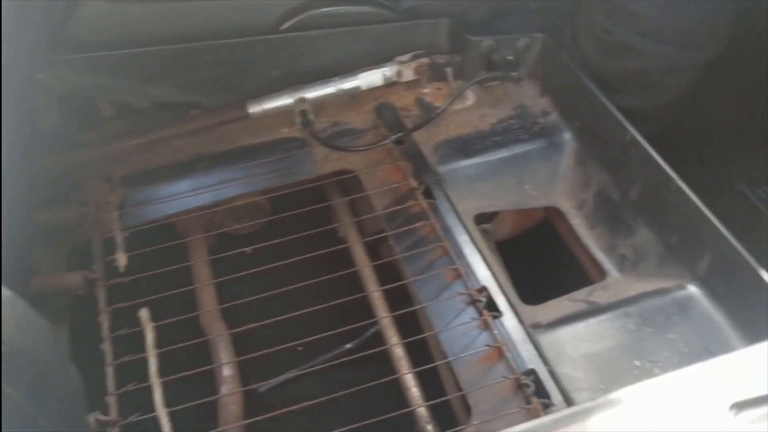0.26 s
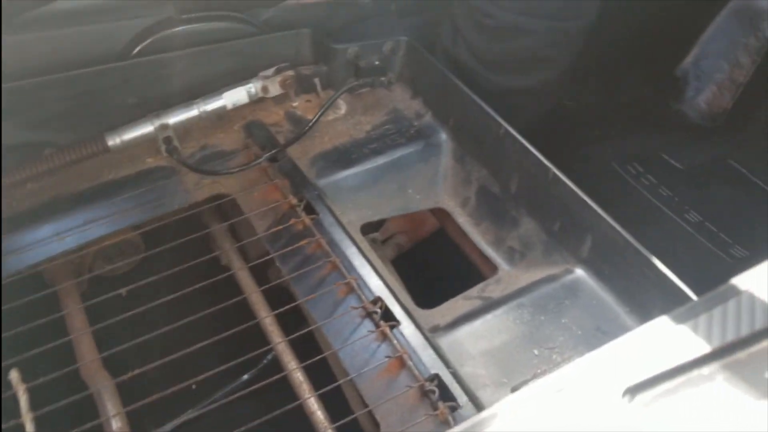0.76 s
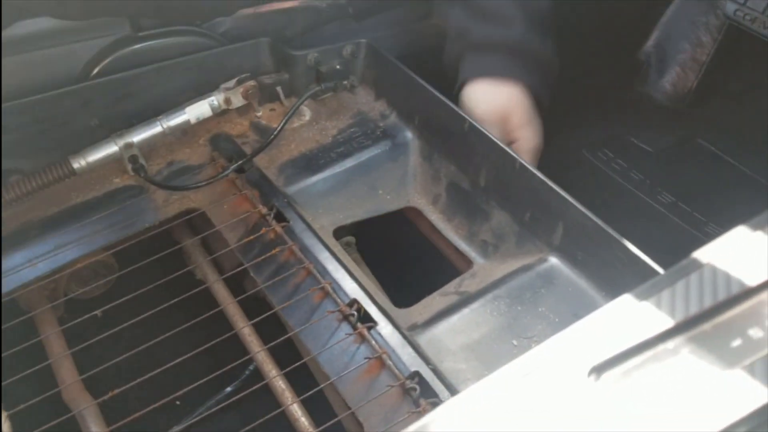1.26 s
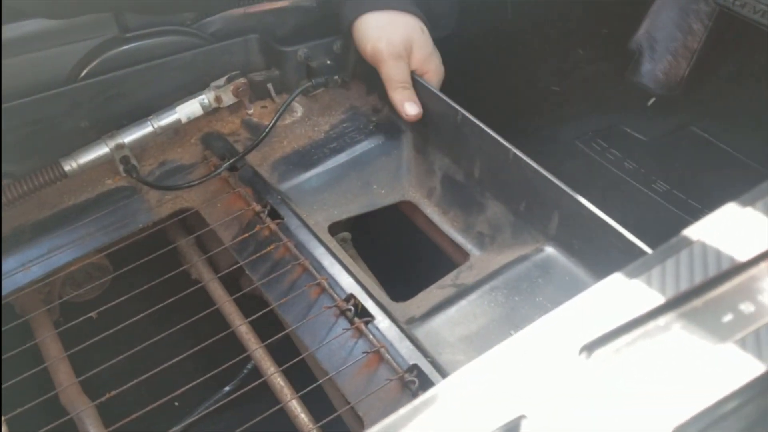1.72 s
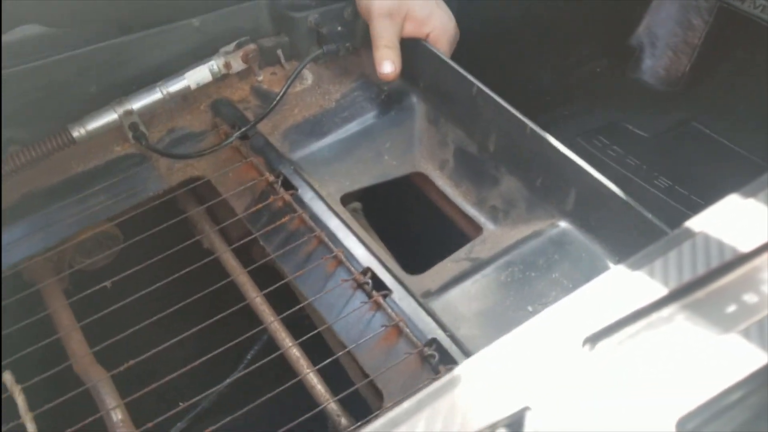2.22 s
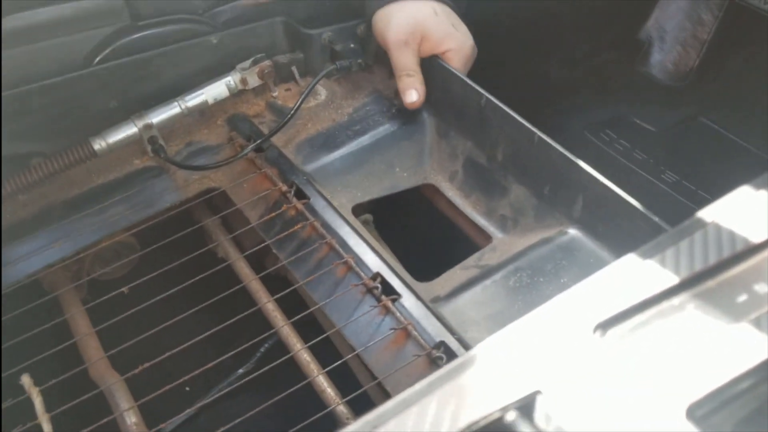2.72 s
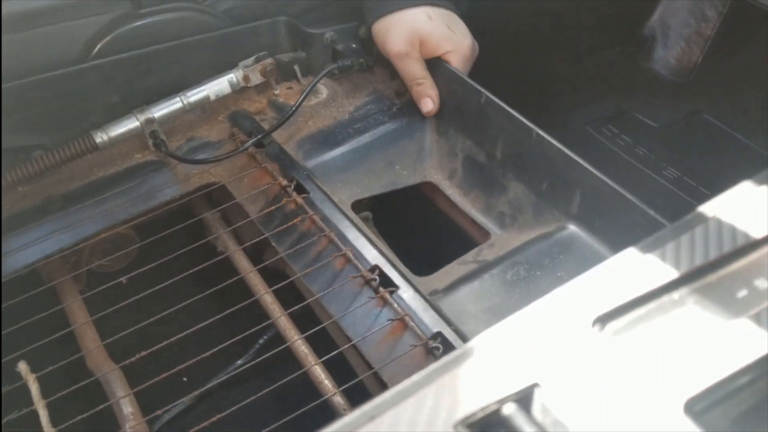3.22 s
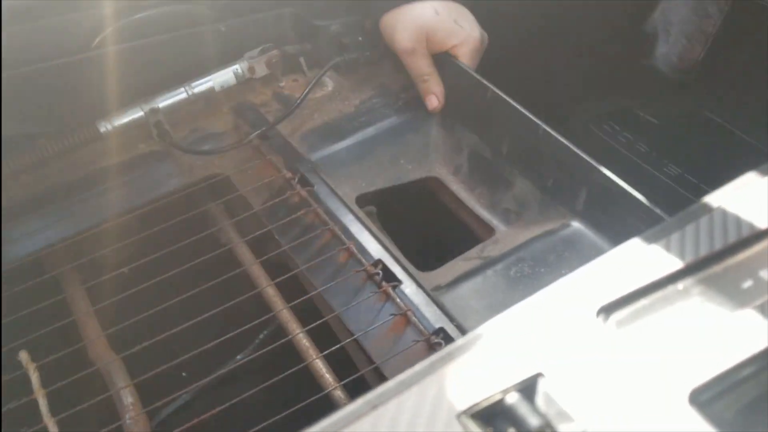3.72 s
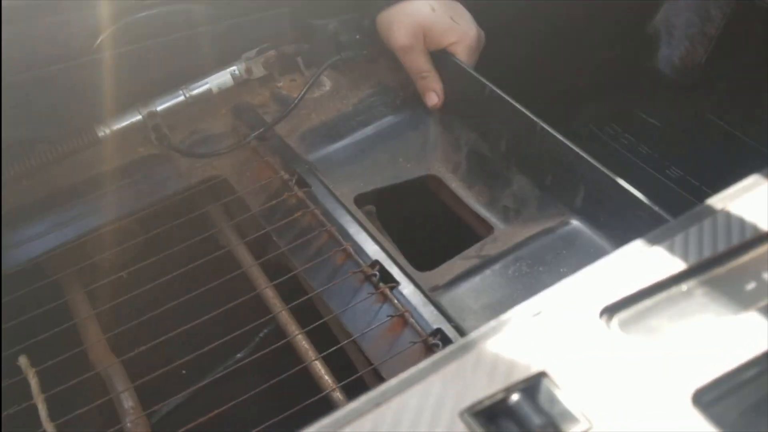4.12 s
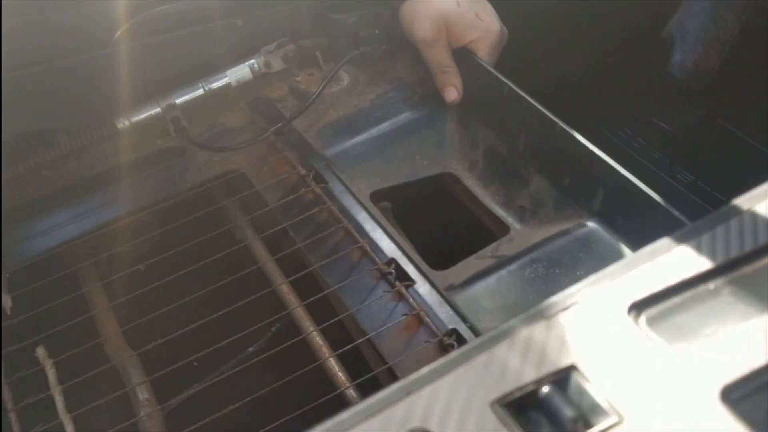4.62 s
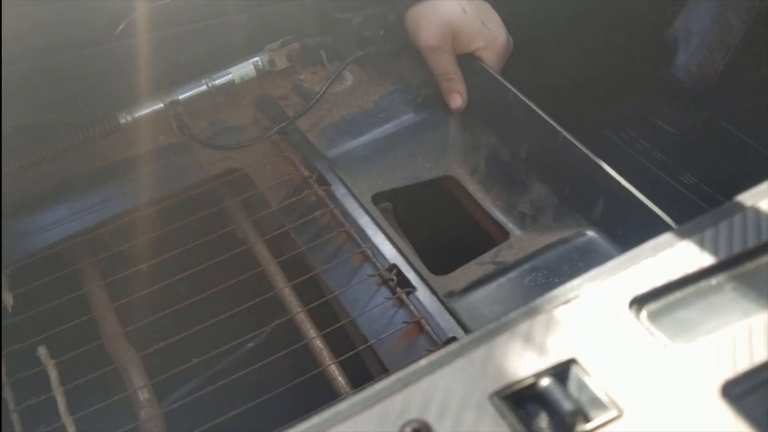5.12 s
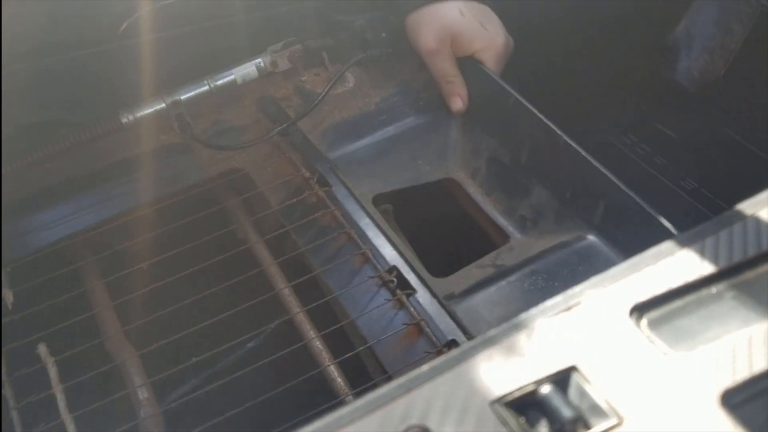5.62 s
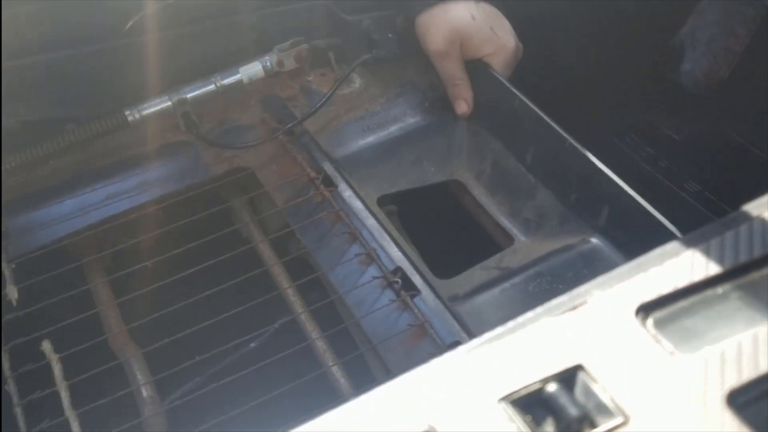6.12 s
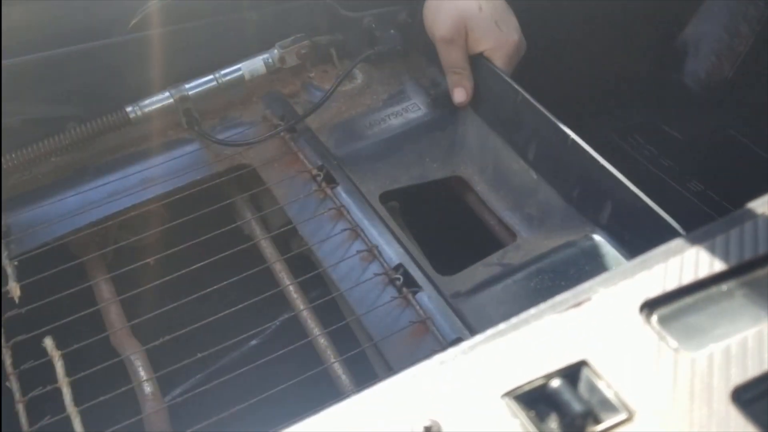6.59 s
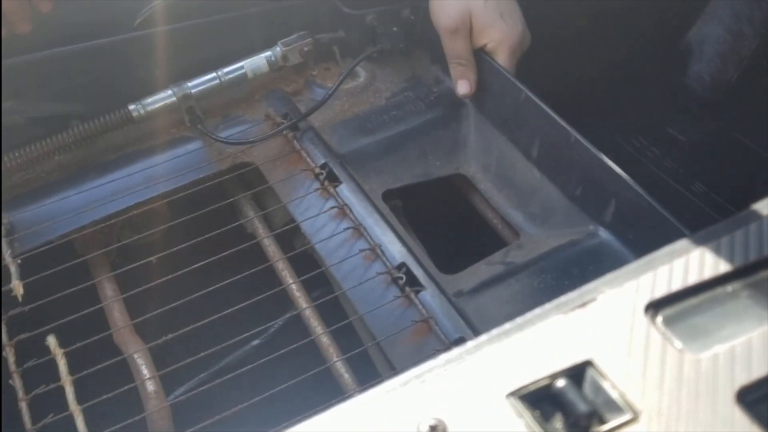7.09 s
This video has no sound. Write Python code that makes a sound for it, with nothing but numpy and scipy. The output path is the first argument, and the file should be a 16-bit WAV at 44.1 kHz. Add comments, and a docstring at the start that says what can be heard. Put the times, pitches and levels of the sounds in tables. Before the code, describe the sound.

Close inside a quiet parked car, a hand shifts a steel seat base. Faint rubs and nudges come first, then a heavy dull thump near two seconds. Rusty scraping and a short low squeal follow, with rattling clacks, and just before and at five seconds thuds and a hard bright clank as it drops home. Afterwards only small ticks and cloth rustle. The work leans left in a short, dull, padded space.

```python
"""Shifting a car seat base by hand

The pressed-steel base of a car seat is shifted onto its bolts, close by, inside a parked car.
It thumps on the floor, scrapes, squeals and clacks along its mounts and drops home; wire springs hum on.
Blows set steel and floor modes ringing, shaped noise makes the scrapes, rumble and rubbing of sleeve
and upholstery, and unsteady sines make the squeals."""
import sys
import numpy as np
from scipy import signal
from scipy.fft import rfft, irfft
from scipy.io import wavfile
from scipy.ndimage import uniform_filter1d

SR = 44100
rng = np.random.default_rng(int(sys.argv[2]) if len(sys.argv) > 2 else 0)


def generate_wav(signal):
    """Clip the signal to [-1, 1] and save it as 16-bit WAV at the path in sys.argv[1]."""
    frames = np.transpose(np.atleast_2d(signal))
    scaled = np.clip(frames, -1, 1) * 32767
    pcm = np.round(scaled).astype(np.int16)
    wavfile.write(sys.argv[1], SR, pcm)


N = 324135   # length in samples
TIME = np.arange(N) / SR


def from_db(db):
    """Turn decibels into a plain gain."""
    return 10 ** (np.asarray(db) / 20)


def rms_one(x):
    """Scale a signal to an average (rms) level of 1."""
    return x / np.sqrt(np.mean(x ** 2) + 1e-20)


def response(points, size=4096):
    """Causal (minimum-phase) impulse response of a spectrum, found through its cepstrum."""
    hz, db = np.transpose(points)
    bins_hz = np.arange(size // 2 + 1) * SR / size
    log_gain = np.log(from_db(np.interp(np.log(bins_hz + 1), np.log(hz), db)))
    cepstrum = irfft(log_gain)[:size // 2]
    cepstrum[1:] *= 2
    return irfft(np.exp(rfft(cepstrum, size)))


def colour(x, points):
    """Filter by a spectrum."""
    return signal.oaconvolve(np.atleast_2d(x), response(points)[None], axes=1)[:, :N]


def band(x, low_hz, high_hz):
    """Band-pass that roughly keeps the power of white noise."""
    sos = signal.butter(2, [low_hz, high_hz], "band", fs=SR, output="sos")
    return signal.sosfilt(sos, x + 1e-18) * np.sqrt(SR / 2 / (high_hz - low_hz))


def ring(clicks, hz, t60):
    """A unit click sets off a sine of height 1 that fades by 60 dB in t60 seconds."""
    r, w = from_db(-60 / (t60 * SR)), 2 * np.pi * hz / SR
    return signal.lfilter([0, np.sin(w)], [1, -2 * r * np.cos(w), r * r], clicks + 1e-18)


def flutter(size):
    """Smooth chance of spread 1 that changes within size samples."""
    smooth = uniform_filter1d(rng.standard_normal(N), size)
    return rms_one(uniform_filter1d(smooth, size))


def grains(per_s, spread_db):
    """Two streams of tiny slips of uneven size; rms 1."""
    sizes = from_db(spread_db * np.minimum(rng.exponential(1, (2, N)), 4))
    happens = rng.random((2, N)) < per_s / SR
    return rms_one(sizes * rng.standard_normal((2, N)) * happens)


SWELL_DB = 20   # rise per attack time and fall per release time


def stroke(start, attack_s, release_s, hold_s=0):
    """Gain of one push: it rises by SWELL_DB per attack time, holds, and falls as much per release time."""
    early = np.maximum(start - TIME, 0)
    late = np.maximum(TIME - start - hold_s, 0)
    return from_db(-SWELL_DB * np.minimum(early / attack_s + late / release_s, 10))


def pan(x, db):
    """Left and right, db apart."""
    return np.array([x * from_db(db / 2), x * from_db(-db / 2)])


# How much of the sound differs between the two sides.
# Each row: frequency in Hz, gain of the differing part in dB.
SIDE_SPREAD = [(60, -11), (250, -12), (550, -3), (1000, -3.5), (3000, -4.5), (15000, 1.5)]


def widen(pair):
    """Left and right from a shared and a scattered part: the bass is nearly alike on both sides."""
    return pair[0] + colour(pair[1], SIDE_SPREAD) * [[1], [-1]]


# Tone of the still air. Each row: frequency in Hz, relative level in dB per Hz.
STILL_AIR_SPECTRUM = [(15, -32.5), (40, -14), (75, 0), (105, -4), (140, -3), (220, -19), (400, -26),
                      (600, -37), (800, -40), (1050, -33), (1600, -42), (2800, -45), (5000, -41),
                      (8000, -51), (15500, -49)]
STILL_AIR_DB = -53   # before widening


def still_air():
    """The quiet of the car is steady noise, shaped by a spectrum and strongest in the bass."""
    noise = rms_one(colour(rng.standard_normal((2, N)), STILL_AIR_SPECTRUM))
    return widen(from_db(STILL_AIR_DB) * noise)


# The seat rocking under the hand, with straight lines in dB between rows.
# Each row: time in seconds, level in dB before the trim, left minus right in dB before the scene's own lean.
ROCKING_PATH = [(0.0, -52, -0.5), (0.75, -56.5, 2), (1.401, -49.5, 4), (1.75, -46.5, 5), (1.93, -43, -2.5),
                (2.38, -50, 3), (2.56, -42, 2.5), (3.13, -49, 1), (3.841, -39.5, -2), (4.15, -50.5, 5),
                (4.39, -46, 1.5), (4.74, -40, -2.5), (4.92, -28.5, -2), (5.351, -50, 1), (5.77, -54.5, 4),
                (7.301, -49, 0.5)]
# Tone of the rumble. Each row: frequency in Hz, relative level in dB per Hz.
RUMBLE_SPECTRUM = [(18, -21.5), (35, 3.5), (60, 8.5), (140, -2), (220, -11), (330, -9.5), (450, -18.5),
                   (600, -29.5), (800, -37), (1100, -29.5), (2000, -45.5), (5000, -71.5)]


def rocking(level_db=-1.0):
    """The loose seat rumbles on the floor in soft lumps as its weight shifts from side to side."""
    s, *columns = np.transpose(ROCKING_PATH)
    effort_db, lean_db = (np.interp(TIME, s, column) for column in columns)
    lumps_db = 3.8 * flutter(size=1200)
    rumble = widen(rms_one(colour(rng.standard_normal((2, N)), RUMBLE_SPECTRUM)))
    return pan(from_db(level_db + effort_db + lumps_db), lean_db) * rumble


# Steel touching steel. Each row: time in seconds, level in dB before the trims,
# hardness in dB (more tick and less clank), clack pitch in Hz.
STEEL_CONTACTS = [(0.177, -70, 1, 3000), (0.389, -66.5, 1.5, 5400), (0.421, -69.5, 7, 2600),
                  (1.331, -65.5, 5, 2200), (1.898, -46, -3, 2340), (1.964, -63, -9, 2450),
                  (2.012, -62, -9, 1810), (2.149, -53, 12.5, 1850), (2.174, -47.5, 0.5, 2400),
                  (2.354, -52, -11, 1500), (2.452, -64, -8, 2300), (2.596, -70, -9, 1500),
                  (2.664, -59, -7, 1150), (2.68, -61, -5, 2500), (2.816, -56, 0, 940),
                  (2.858, -55.5, 0.5, 1900), (3.174, -57, 8, 2700), (3.212, -61, -2, 1400),
                  (3.355, -53.5, 5.5, 2250), (3.392, -53, -6, 1250), (3.414, -43, 1.5, 1650),
                  (3.635, -47, 0, 2550), (3.648, -39.5, -1, 2550), (3.799, -48.5, -1, 1900),
                  (3.817, -36.5, 1.5, 2000), (3.82, -29.5, -1.5, 2400), (3.834, -41, -5, 1900),
                  (3.855, -51, -4, 2400), (3.872, -41, 0, 2600), (3.898, -40.5, -4, 2500),
                  (3.905, -39, -1, 2500), (3.914, -35.5, 3, 2600), (3.92, -45, 1, 2590),
                  (3.944, -53, 12.5, 3300), (4.266, -69, 5, 4250), (4.365, -70, 3, 1750),
                  (4.506, -41, 1.5, 2440), (4.519, -40, 4, 2930), (4.561, -56, 2, 1800),
                  (4.614, -42.5, 1, 2500), (4.674, -56, -4, 2600), (4.71, -55, 11, 2550),
                  (4.84, -42.5, 11.5, 2950), (4.875, -48.5, -7, 1190), (4.911, -46.5, -2, 1880),
                  (4.9434, -33, -3.5, 2000), (4.946, -41.5, -6, 1950), (4.999, -23, -1.5, 2500),
                  (4.9985, -33.5, 8, 2300), (5.003, -27.5, -3.5, 1900), (5.019, -27.5, 5.5, 3000),
                  (5.022, -34.5, 0, 2200), (5.038, -46, 17, 2170), (5.055, -41, 0, 2230),
                  (5.066, -36.5, 8, 2540), (5.07, -40, -4.5, 2280), (5.083, -61, -6, 2120),
                  (5.097, -52, 7, 2600), (5.151, -54, -10, 2700), (5.775, -64.5, -8.5, 2100),
                  (6.069, -60.5, -4.5, 2300), (6.221, -63.5, -2, 1400), (6.261, -48, 1, 1500),
                  (6.404, -59, -4, 3150), (6.461, -56.5, -3.5, 2800), (6.504, -63.5, 0, 1700),
                  (6.619, -65.5, -11, 1890), (6.697, -51.5, 6, 2100), (6.774, -54.5, 7, 3100),
                  (6.829, -56, 4, 2700), (6.939, -57.5, 1.5, 3400), (7.345, -44, 3, 2300)]
# Tone of the tick. Each row: frequency in Hz, gain in dB.
TICK_SPECTRUM = [(2500, -32), (3700, 2.5), (5000, 0), (6400, -4.5), (7600, -12.5), (8800, -29.5),
                 (12000, -45.5)]
CHATTER_T60_S = 0.053   # time for the chatter to fade by 60 dB


def contacts(crack_db=-5.5, crack_s=0.0023, graze_s=0.001, clank_db=-2.5, clack_db=-6.0, clack_span=1.13,
             tick_db=-2.0, sparkle_db=-18.0, sparkle_s=0.016, hardening=0.77):
    """Edges graze, crack together and chatter to rest; broad faces clank, hard edges tick."""
    out, lead = np.zeros((2, N)), SR // 100
    chatter, grit = grains(per_s=16000, spread_db=0.5), grains(per_s=4000, spread_db=3.0)
    clank, tick, sparkle = np.zeros((3, N))
    for s, db, hardness, hz in STEEL_CONTACTS:
        at = round(s * SR) - lead   # begin early, to leave room for the graze
        age = (np.arange(min(SR // 3, N - at)) - lead) / SR
        after, before = np.maximum(age, 0), np.minimum(age, 0)
        decay = from_db(-60 * after / CHATTER_T60_S)
        crack = from_db(crack_db) * np.exp(-after / crack_s)
        shape = (decay + crack) * np.exp(before / graze_s)
        span = slice(at, at + len(age))
        hard_db = db + hardness
        clank[span] += from_db(db - hardness + clank_db) * shape
        tick[span] += from_db(hard_db + tick_db) * shape
        # a harder blow has a shorter contact and so a brighter top
        bright_db = hard_db + sparkle_db + hardening * (hard_db + 30.5)
        sparkle[span] += from_db(bright_db) * shape * np.exp(-after / sparkle_s)
        clack = band(shape * chatter[:, span], hz / clack_span, hz * clack_span)
        out[:, span] += from_db(db + clack_db) * clack
    out += band(clank * chatter, 780, 1300)
    out += colour(tick * chatter, TICK_SPECTRUM)
    return out + band(sparkle * grit, 6400, 22000)


# Ringing modes of the steel pan.
# Each row: frequency in Hz, width in Hz (wider fades sooner), level in dB before the ring level.
STEEL_PAN_MODES = [(827, 6.7, -2), (909, 12, 9), (970, 33, 7), (1187, 55, 5.5), (1333, 27, 1),
                   (1440, 38, 4.5), (1820, 70, 4.5), (2055, 100, 8.5), (2370, 53, 5.5), (2540, 80, -1),
                   (3184, 40, -12.5), (3280, 23, 1), (3660, 33, 7.5), (3890, 45, 7), (4370, 19, 9),
                   (4540, 24, -2), (4940, 55, -4)]


def steel_pan(x, direct_db, ring_db):
    """The pan passes a blow on and rings in its modes."""
    out = from_db(direct_db) * x
    for hz, width, db in STEEL_PAN_MODES:
        r = np.exp(-np.pi * width / SR)
        feed = [(1 - r * r) / 2, 0, (r * r - 1) / 2]
        feedback = [1, -2 * r * np.cos(2 * np.pi * hz / SR), r * r]
        out = out + from_db(db + ring_db) * signal.lfilter(feed, feedback, x + 1e-18)
    return out


# The seat's weight landing on the floor. Each row: time in seconds, level in dB before the trims,
# hardness in dB (more knock and less boom), boom pitch in Hz, drum level in dB above the blow, knock pitch in Hz.
FLOOR_LANDINGS = [(0.435, -42.5, -1.5, 67, 6, 291), (1.13, -53.5, -9.5, 80, 3, 283),
                  (1.245, -42, -3, 80, -16, 280), (1.316, -41, -4, 75, -3, 298),
                  (1.607, -49.5, -7, 76, -1, 350), (1.719, -55, 0, 74, -10, 300),
                  (1.897, -43, 15, 70, 0, 338), (1.965, -44, 5.5, 74, 10.5, 290),
                  (2.01, -26.5, -4.5, 70, -7, 308), (2.06, -27.5, -3, 72, -10, 298),
                  (2.35, -15.5, -0.5, 67, -8.5, 315), (2.588, -35, -1, 70, -5, 310),
                  (2.657, -38, 4, 72, 6, 395), (2.682, -45, 0, 70, 7, 393),
                  (2.811, -38, -6.5, 60, -2.5, 300), (3.212, -54.5, 12, 65, 0, 420),
                  (3.402, -32.5, 9, 62, 6, 349), (3.644, -34.5, -1, 66, 1.5, 450),
                  (3.8, -38, 8, 66, 4, 378), (3.817, -34, 5, 66, 1.5, 430),
                  (3.837, -22.5, -1.5, 66, -0.5, 313), (3.873, -25, 3.5, 66, 6, 318),
                  (3.9, -24.5, -0.5, 62, 8, 332), (4.018, -40, 3, 60, 1, 352),
                  (4.256, -38.5, -1.5, 60, -1, 343), (4.5, -30, -1.5, 62, 2, 310),
                  (4.614, -17.5, -3, 60, -7, 280), (4.672, -35.5, 6, 60, 0, 336),
                  (4.707, -29.5, -4.5, 56.6, -6, 330), (4.843, -23, 4, 62, -0.5, 302),
                  (4.874, -27.5, 3, 62, 2.5, 322), (4.941, -35.5, 14.5, 80, 0, 473),
                  (4.998, -23.5, 12.5, 62, 7, 445.5), (5.019, -17.5, 2, 62, 1.5, 355),
                  (5.043, -20.5, -4, 62, 2.5, 280), (5.08, -25.5, 7.5, 60, -1.5, 280),
                  (6.245, -39.5, 2, 60, 1, 348), (6.463, -39, 0.5, 75, -2.5, 376),
                  (6.765, -48, 12.5, 65, 6, 355), (6.964, -40.5, 5.5, 68, -3, 342),
                  (7.142, -44.5, -2.5, 68, -2.5, 350), (7.344, -29.5, 5.5, 65, 4.5, 474)]
# Modes of floor pan, frame and cabin air.
# Each row: frequency in Hz, relative level in dB, time to fade by 60 dB in seconds.
FLOOR_AND_FRAME_MODES = [(42.5, -8, 0.18), (53.3, -21, 0.18), (82, -5.5, 0.11), (108, -2.5, 0.15),
                         (143.4, 1, 0.19), (176.5, -11.5, 0.27), (216.6, -11, .11), (265, -6, 0.16),
                         (308.5, -2.5, .13), (327.3, -7, 0.18), (372, -3, .16), (434, -5, 0.14),
                         (476, -2.5, .06), (530, -5, 0.055), (598, -7.5, 0.22), (1050, -4, .05),
                         (1200, -2.5, .06)]
# Modes of the wire springs.
# Each row: frequency in Hz, relative level in dB, time to fade by 60 dB in seconds.
WIRE_SPRING_MODES = [(86, -33, 1.5), (146, -33, 1.6), (153, -34, 1.8), (194, -35, 1.0), (248, -42, 1.5),
                     (301, -38, .8)]
BOOM_T60_S, BOOM_DB = 0.25, 5.5   # the floor's boom; its pitch depends on where the seat lands
KNOCK_FOCUS_DB_PER_OCTAVE = 20   # how fast modes away from the knock pitch weaken


def thumps(drum_db=0.0, knock_db=-1.0, uneven_db=2.5, spring_db=5.5):
    """The floor booms, panels drum and the frame knocks, by landing spot; each blow shakes the springs."""
    s, level, hardness, boom_hz, drum_above, knock_hz = np.transpose(FLOOR_LANDINGS)
    boom = level - hardness
    drum = level + drum_above + drum_db
    knock = level + hardness + knock_db
    at, out = np.round(s * SR).astype(int), np.zeros(N)
    for start, db, hz in zip(at, boom, boom_hz):
        tail = out[start:start + SR // 2]
        tail -= from_db(db + BOOM_DB) * ring(signal.unit_impulse(len(tail)), hz, BOOM_T60_S)
    chance = rng.standard_normal((len(at), len(FLOOR_AND_FRAME_MODES)))
    for k, (hz, db, t60) in enumerate(FLOOR_AND_FRAME_MODES):
        if hz < 100:
            blow = boom
        elif hz < 230:
            blow = drum
        else:
            blow = knock - KNOCK_FOCUS_DB_PER_OCTAVE * np.abs(np.log2(hz / knock_hz))
        clicks = np.bincount(at, from_db(blow + uneven_db * chance[:, k]), N)
        out += (-1) ** k * from_db(db) * ring(clicks, hz, t60)   # neighbours start in opposite directions
    shake = np.bincount(at, from_db(drum + spring_db), N)
    return out + sum(from_db(db) * ring(shake, hz, t60) for hz, db, t60 in WIRE_SPRING_MODES)


# Soft bumps of the arm, which stir only the panels. Each row: time in seconds, level in dB before the modes.
ARM_BUMPS = [(0.435, -30.5), (0.577, -38.5), (1.012, -35), (1.049, -37.5), (1.2, -36.5), (1.245, -31),
             (1.321, -36), (1.385, -39), (4.131, -40), (6.246, -43), (6.467, -34.5)]
BUMP_LEAN_DB = -10   # left minus right, before the scene's own lean


def bumps():
    """The arm nudges the panels on the right; only their drumming modes answer."""
    s, level = np.transpose(ARM_BUMPS)
    clicks = np.bincount(np.round(s * SR).astype(int), from_db(level), N)
    panels = [mode for mode in FLOOR_AND_FRAME_MODES if 100 < mode[0] < 230]
    out = np.zeros(N)
    for k, (hz, db, t60) in enumerate(panels):
        out += (-1) ** k * from_db(db) * ring(clicks, hz, t60)
    return pan(out, BUMP_LEAN_DB)


# Fabric rubbing. Each row: start of the full rub in seconds, its length in seconds, level in dB before the trim.
FABRIC_RUBS = [(0.593, 0.098, -75.5), (1.305, 0.16, -68.5), (1.945, 0.21, -67.5), (2.323, 0.26, -75.5),
               (2.995, 0.34, -67.5), (4.456, 0.6, -77), (6.03, 0.12, -68.5), (6.382, 0.078, -70.5),
               (6.619, 0.039, -67.5), (6.945, 0.24, -75.5)]
# Tone of the fabric. Each row: frequency in Hz, relative level in dB per Hz.
FABRIC_SPECTRUM = [(200, -22.5), (450, 2), (700, -8.5), (1100, -3), (2000, -4.5), (2900, -9), (4400, -3.5),
                   (6000, -3), (7000, -11.5), (8300, -25), (10000, -22), (15500, -23)]
RUB_ATTACK_S, RUB_RELEASE_S = 0.18, 0.19   # per SWELL_DB of rise or fall


def fabric(rub_db=9.0, catch_db=2.5):
    """Cloth drags over the frame: countless fibres catch and let go."""
    fibres = rms_one(colour(grains(per_s=11000, spread_db=0.5), FABRIC_SPECTRUM))
    drag = sum(from_db(db) * stroke(s, RUB_ATTACK_S, RUB_RELEASE_S, length) for s, length, db in FABRIC_RUBS)
    return from_db(rub_db + catch_db * flutter(size=600)) * drag * fibres


# Shoves along the mounts. Each row: time of the hardest push in seconds, swell and release in seconds
# per SWELL_DB, grind level in dB, rasp above grind in dB, both levels before the trims.
MOUNT_SHOVES = [(0.67, 0.18, 0.094, -56.5, -7), (2.181, 0.058, 0.055, -45, -6.5),
                (2.355, 0.0035, 0.065, -41.5, -11), (2.66, 0.007, 0.041, -48, -28),
                (1.785, 0.058, 0.081, -48, -18), (1.894, 0.15, 0.051, -58, -2.5),
                (2.019, 0.015, 0.48, -50, -7.5), (3.391, 0.071, 0.025, -40, -13),
                (3.422, 0.076, 0.034, -33, -10), (3.645, 0.045, 0.079, -36, -7),
                (3.695, 0.047, 0.046, -31, -10.5), (3.834, 0.024, 0.066, -32.5, -7),
                (3.912, 0.08, 0.055, -33, -8), (4.02, 0.45, 0.38, -60, -2.5),
                (4.621, .01, 0.063, -42.5, -13), (4.71, 0.041, 0.079, -48.5, -9.5),
                (4.514, 0.07, 0.012, -46.5, -7), (4.873, 0.046, 0.049, -35.5, -5.5),
                (4.943, 0.018, 0.017, -39.5, 3.5), (4.999, .002, 0.03, -20.5, -12.5),
                (5.069, 0.067, 0.037, -26, -10.5), (5.152, 0.17, 0.17, -56.5, -0.5),
                (6.25, 0.19, 0.016, -53, -6), (6.692, 0.074, 0.02, -55, 7)]
# Tones of the low grind and the high rasp. Each row: frequency in Hz, relative level in dB per Hz.
GRIND_SPECTRUM = [(110, -11.5), (240, 4), (430, 7), (700, -4), (920, -1.5), (1300, -8), (2000, -17.5),
                  (4000, -51)]
RASP_SPECTRUM = [(900, -22.5), (1800, 0.5), (2600, -1), (5500, 0.5), (7000, -10.5), (8600, -25),
                 (10000, -13.5), (15500, -18.5)]


def scrapes(grind_db=-3.0, rasp_db=-7.5, judder_db=2.5):
    """Rusty steel slides in dense small slips, and judders: a low grind and a high rasp."""
    slips = grains(per_s=1600, spread_db=1.0) * from_db(judder_db * flutter(size=220))
    grind, rasp = np.zeros((2, N))
    for s, swell_s, release_s, db, rasp_above in MOUNT_SHOVES:
        push = from_db(db) * stroke(s, swell_s, release_s)
        grind = np.maximum(grind, push)
        rasp = np.maximum(rasp, from_db(rasp_above) * push)
    low = from_db(grind_db) * grind * rms_one(colour(slips, GRIND_SPECTRUM))
    high = from_db(rasp_db) * rasp * rms_one(colour(slips, RASP_SPECTRUM))
    return low + high


# A rail sticks and slips. Each row: time of the hardest push in seconds, swell and release in seconds
# per SWELL_DB, unloaded pitch in Hz, level in dB before the roughness.
RAIL_SQUEALS = [(0.655, 0.089, 0.084, 460, -49.5), (3.425, 0.023, 0.038, 581, -34.5),
                (3.56, 0.2, 0.31, 563, -60), (3.677, 0.038, 0.0393, 527, -16),
                (3.736, 0.026, 0.032, 492.4, -27)]
SQUEAL_SAG, SAG_AT_DB = 0.136, -18.5   # load holds each stick longer: share of pitch lost at this level


def squeal(row, jitter=0.023, rough_db=3.5, second_db=-12.5, fall_db=-3.5):
    """Stick-slip locks to an unsteady pitch that sags under load, with two weak overtones."""
    s, swell_s, release_s, hz, db = row
    load = from_db(db) * stroke(s, swell_s, release_s)
    pitch = hz * (1 - SQUEAL_SAG * np.minimum(load / from_db(SAG_AT_DB), 1))
    phase = 2 * np.pi * np.cumsum(pitch * (1 + jitter * flutter(size=90))) / SR
    overtones = sum(from_db(second_db + fall_db * k) * np.sin((k + 2) * phase) for k in range(2))
    return load * from_db(rough_db * flutter(size=200)) * (np.sin(phase) + overtones)


# Bolts screech through their slots near 4 kHz; the row near 2 kHz is the brief ring of a struck bolt.
# Each row: time of the loudest moment in seconds, swell and release in seconds per SWELL_DB,
# pitch in Hz, level in dB.
BOLT_BANDS = [(4.945, .003, 0.012, 2000, -20.5), (3.838, .02, 0.017, 4100, -40),
              (5.057, 0.043, 0.019, 4400, -37), (5.07, .012, 0.017, 3900, -31.5)]


def bolt_ring_and_screeches(span=1.06):
    """Uneven grains, which lock to no pitch, fill one narrow band per struck or screeching bolt."""
    slips, out = grains(per_s=4000, spread_db=1.0)[0], np.zeros(N)
    for s, swell_s, release_s, hz, db in BOLT_BANDS:
        out += from_db(db) * stroke(s, swell_s, release_s) * band(slips, hz / span, hz * span)
    return out


def cabin(x, t60=0.13, wet_db=-11.5, dull_hz=5000):
    """Close, padded walls return a short dull tail, made of fading noise."""
    age = TIME[:SR // 2]
    tail = rng.standard_normal((2, len(age))) * from_db(-60 * age / t60) * (age > .004)
    tail = tail / np.sqrt(np.sum(tail ** 2, axis=1, keepdims=True))
    tail = signal.sosfilt(signal.butter(1, [200, dull_hz], "band", fs=SR, output="sos"), tail)
    return x + from_db(wet_db) * signal.oaconvolve(x, tail, axes=1)[:, :N]


# How far the work leans to the left. Each row: frequency in Hz, left minus right in dB.
LEFT_LEAN = [(60, 3), (120, 5), (350, 8.5), (490, 7.5), (750, 2), (1300, 8.5), (2400, 13.5), (4400, 14),
             (8100, 7), (15000, 4)]
RIGHT_LAG_S = 11 / SR


def scene():
    """The work goes on to the left, over the still air of the car."""
    struck = steel_pan(contacts(), direct_db=4.5, ring_db=-4.5)
    scraped = steel_pan(scrapes(), direct_db=5.0, ring_db=-8.5)   # pressing damps the pan
    # carpet softens the blows
    cushioned = signal.sosfilt(signal.butter(2, 1000, fs=SR, output="sos"), thumps())
    work = widen(struck + scraped + fabric()) + rocking() + bumps() + cushioned
    work = work + bolt_ring_and_screeches() + sum(squeal(row) for row in RAIL_SQUEALS)
    left, right = cabin(work)
    left = colour(left, [(hz, db / 2) for hz, db in LEFT_LEAN])
    right = colour(right, [(hz, -db / 2) for hz, db in LEFT_LEAN])
    right = np.interp(TIME - RIGHT_LAG_S, TIME, right[0])   # the far side hears it later
    return np.vstack([left, right]) + still_air()


CUTOFF_HZ = 15800


def record(dry):
    """The deepest bass is lost, the highest peaks are rounded, the top is cut steeply."""
    thinned = signal.sosfilt(signal.butter(2, 32, "high", fs=SR, output="sos"), dry)
    rounded = np.tanh(thinned)
    return signal.sosfilt(signal.ellip(10, .1, 80, CUTOFF_HZ, fs=SR, output="sos"), rounded)


dry = scene()
out = record(dry)
generate_wav(out)
```